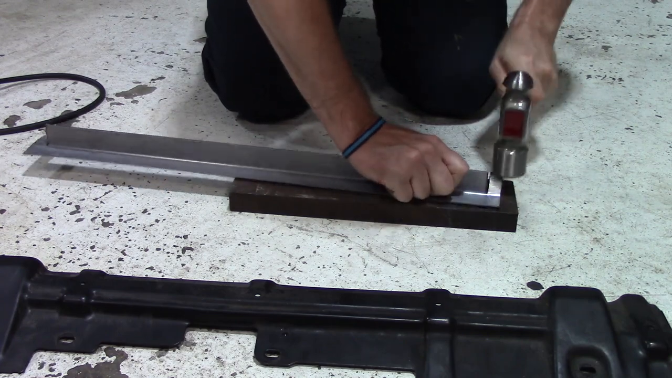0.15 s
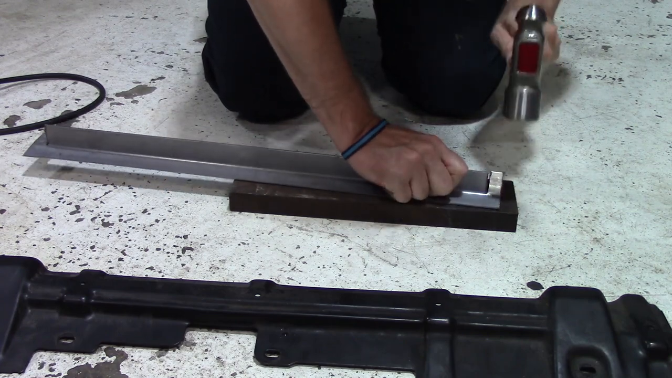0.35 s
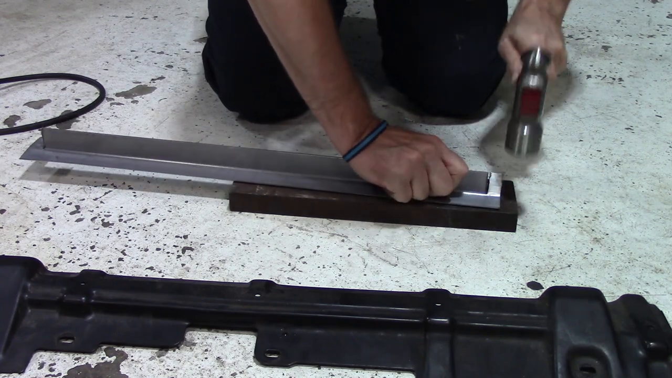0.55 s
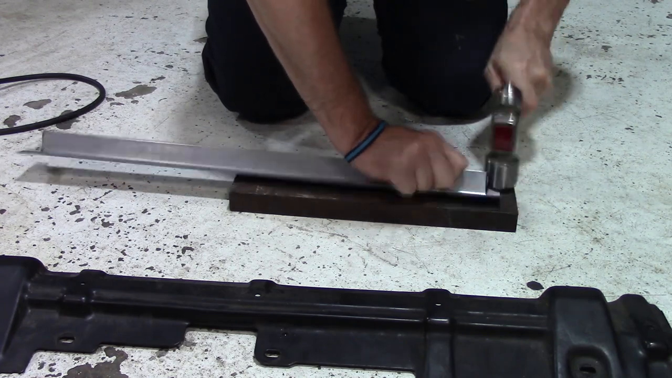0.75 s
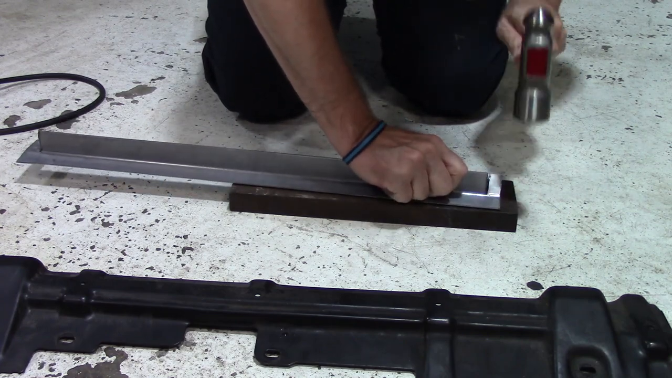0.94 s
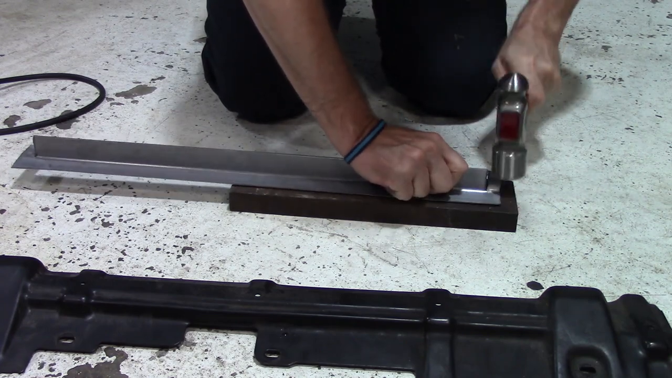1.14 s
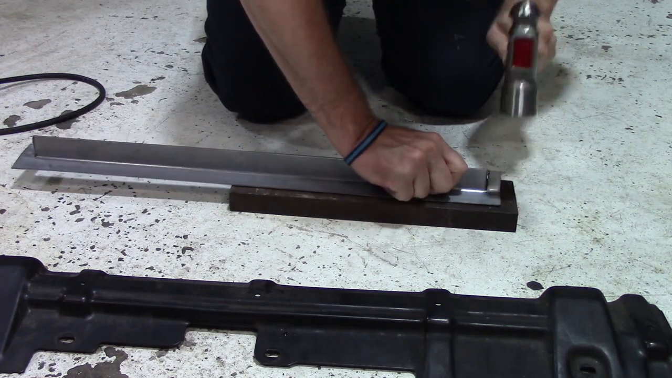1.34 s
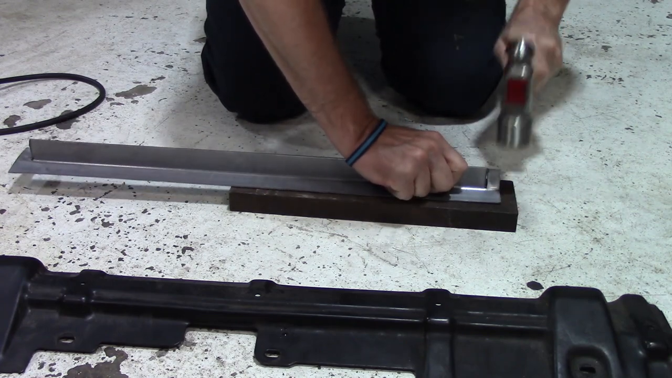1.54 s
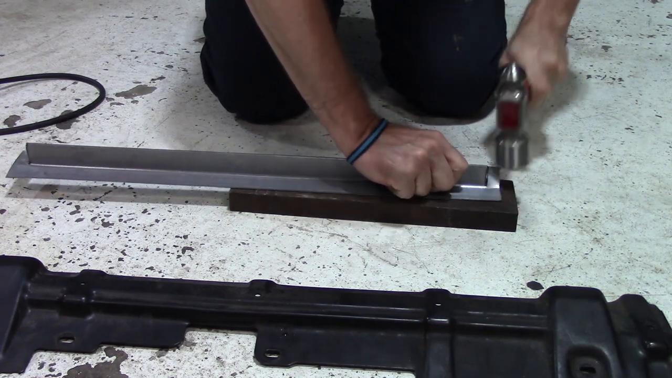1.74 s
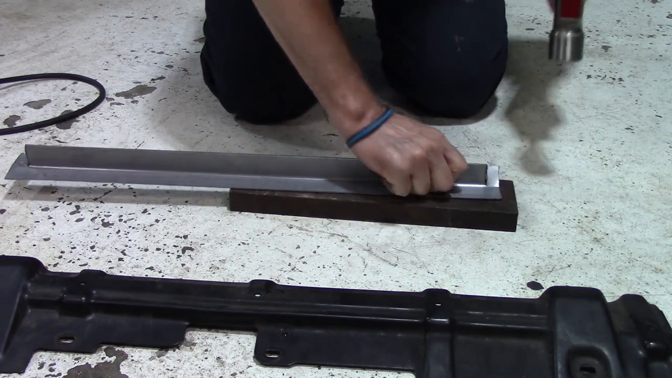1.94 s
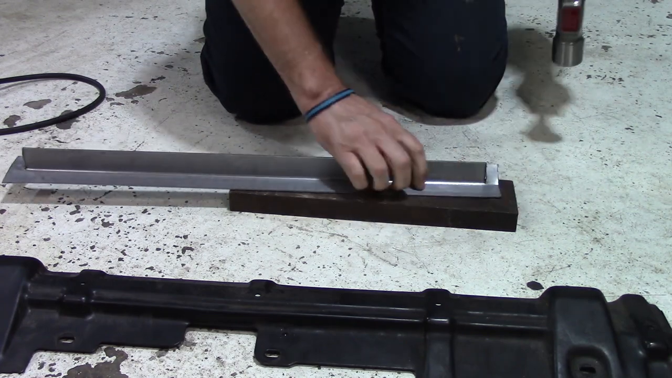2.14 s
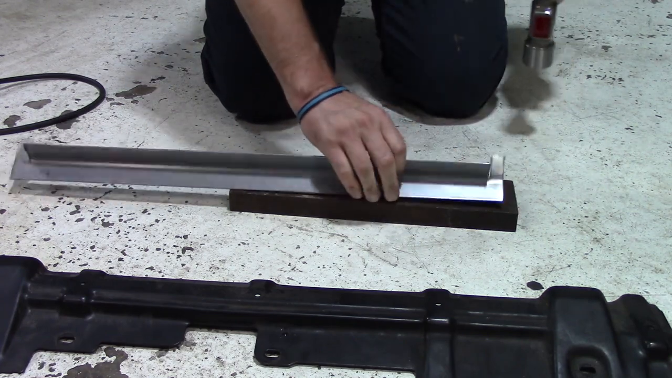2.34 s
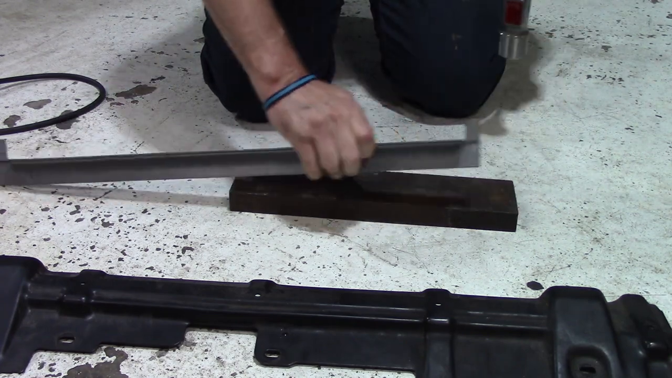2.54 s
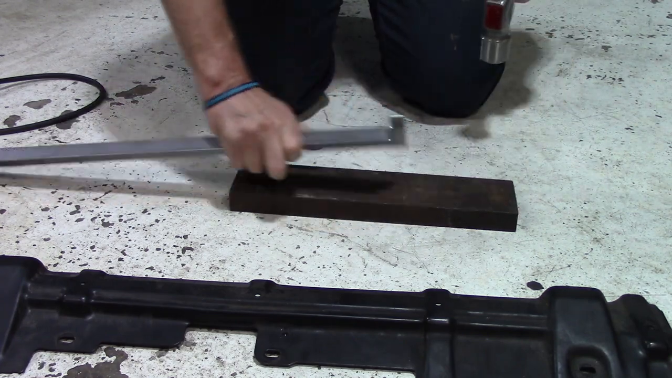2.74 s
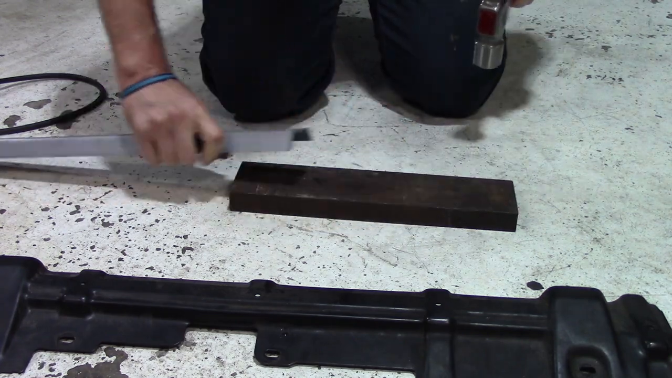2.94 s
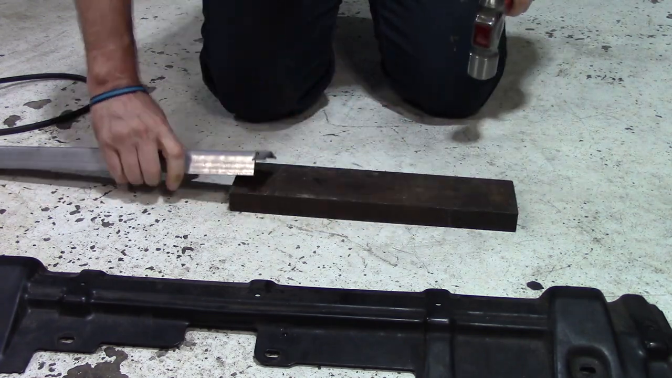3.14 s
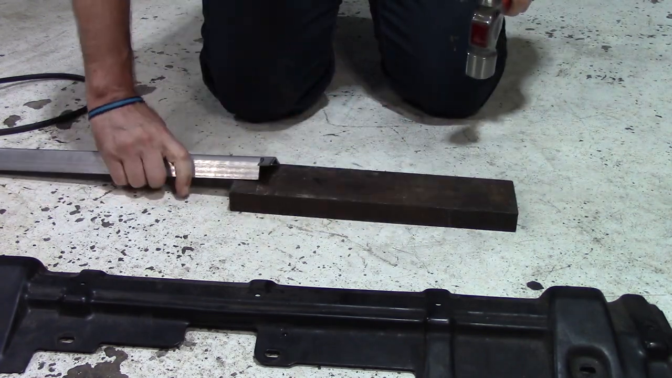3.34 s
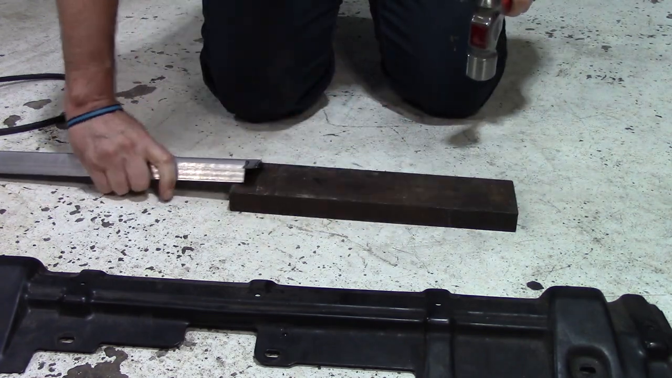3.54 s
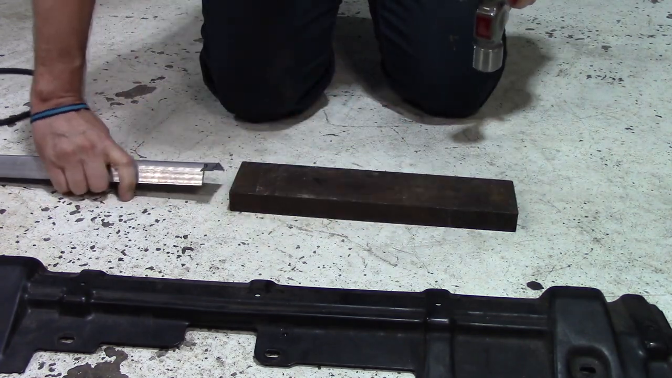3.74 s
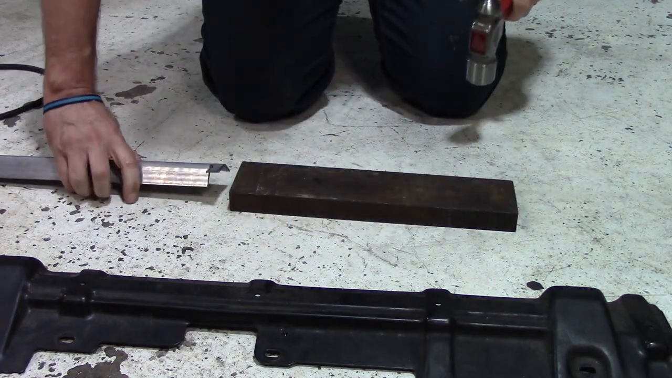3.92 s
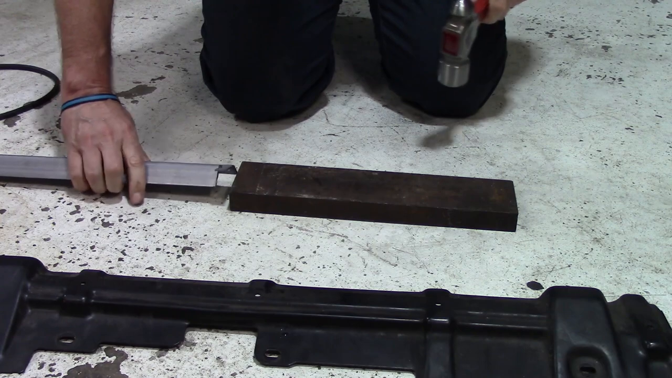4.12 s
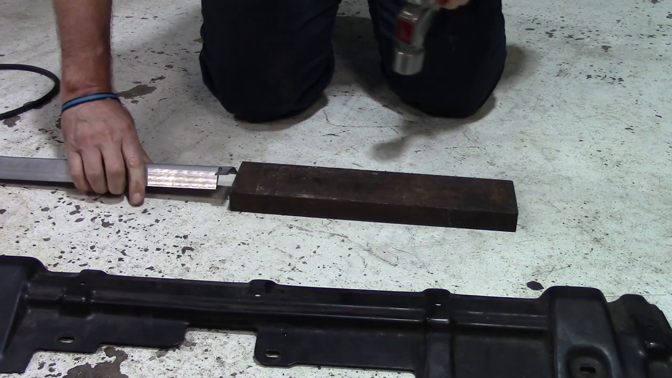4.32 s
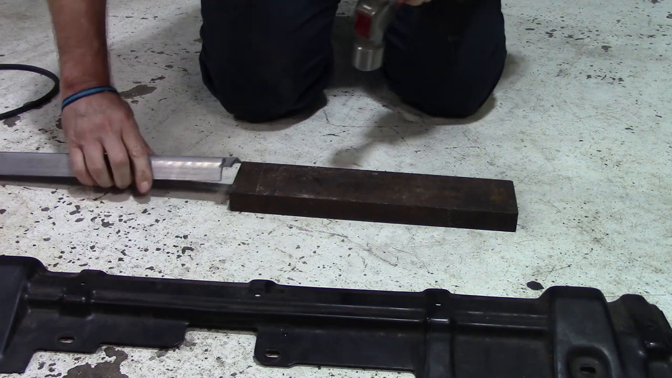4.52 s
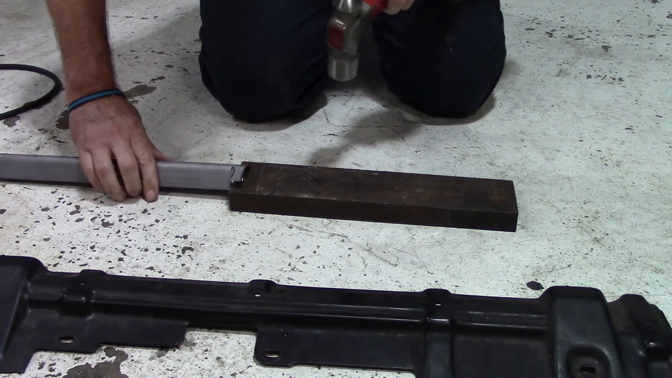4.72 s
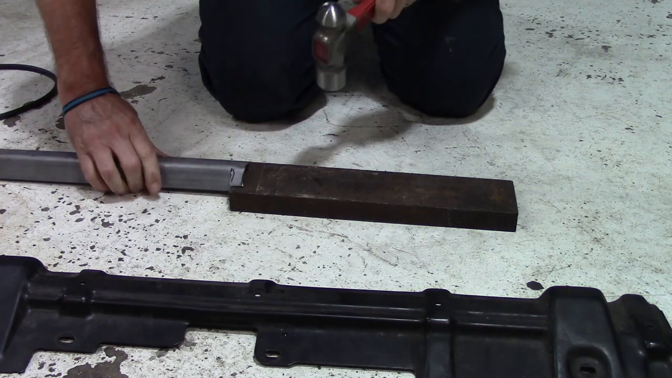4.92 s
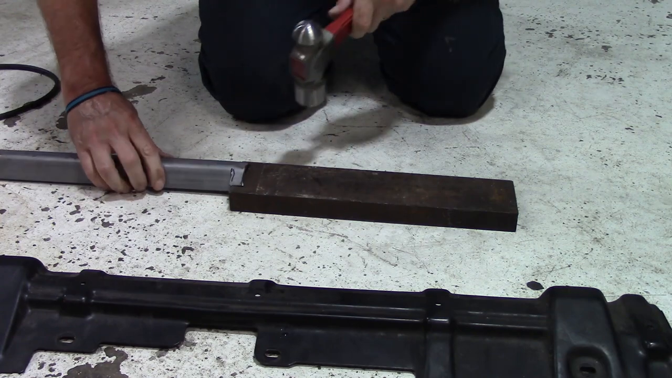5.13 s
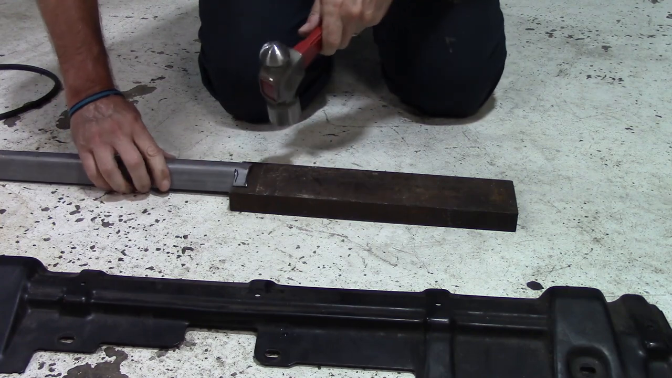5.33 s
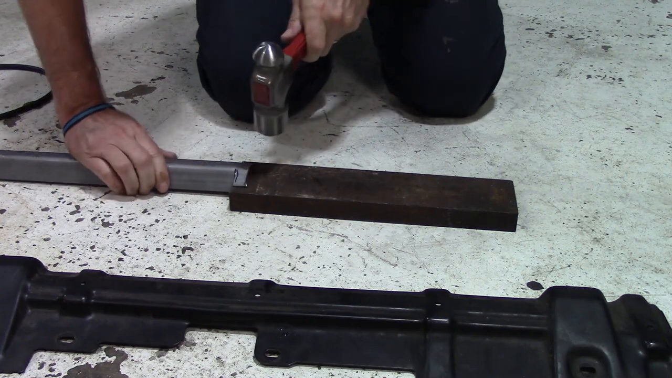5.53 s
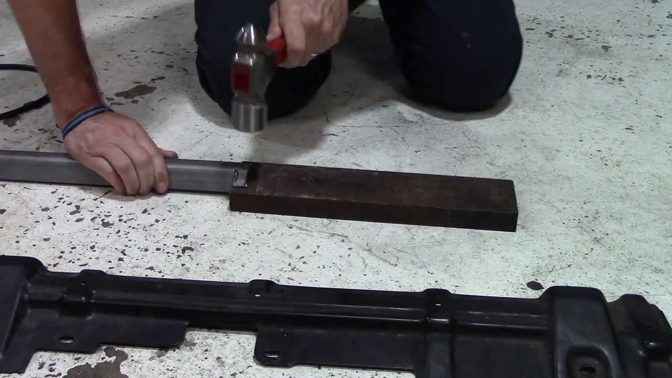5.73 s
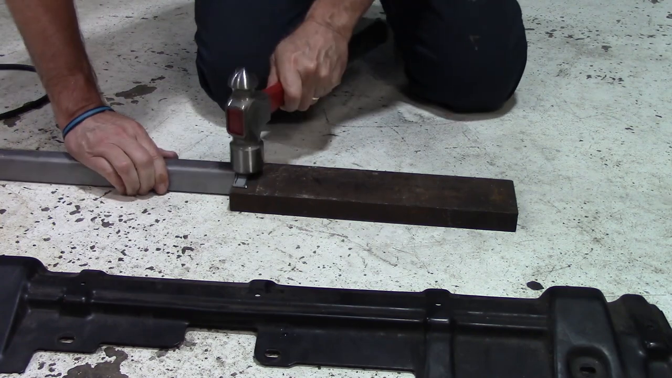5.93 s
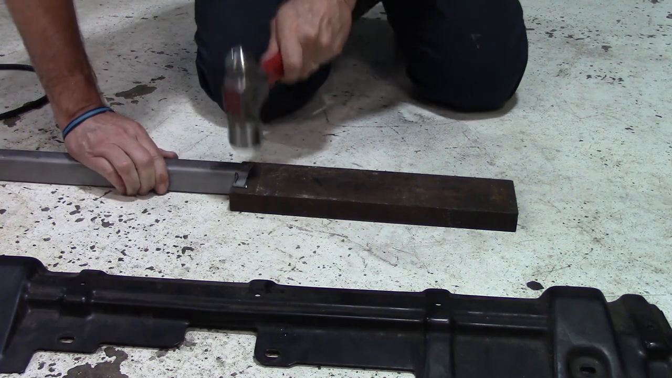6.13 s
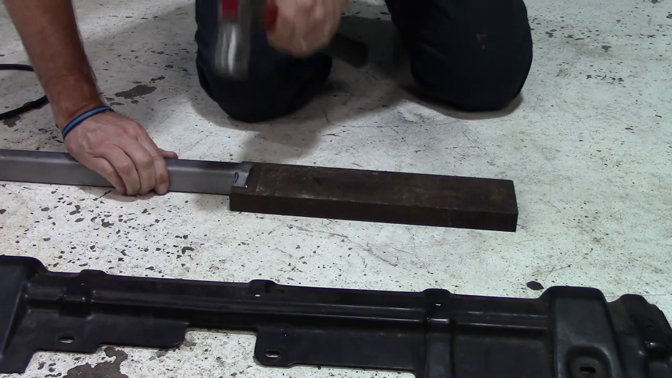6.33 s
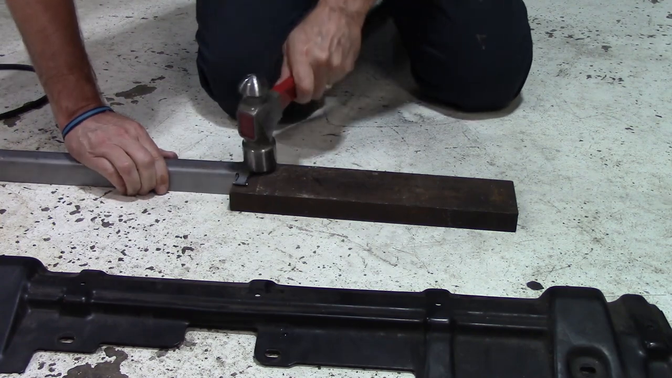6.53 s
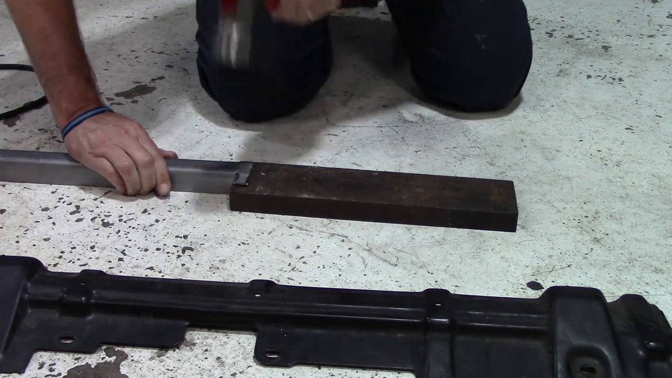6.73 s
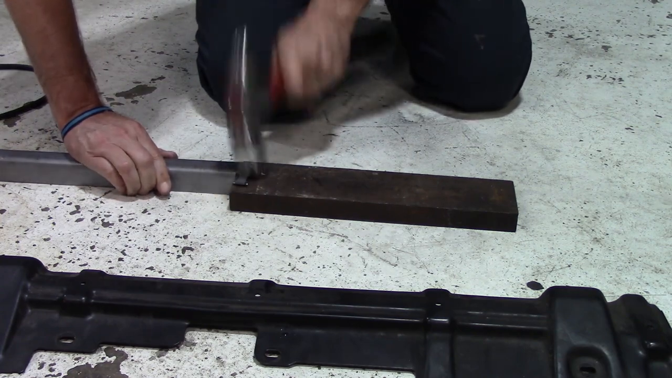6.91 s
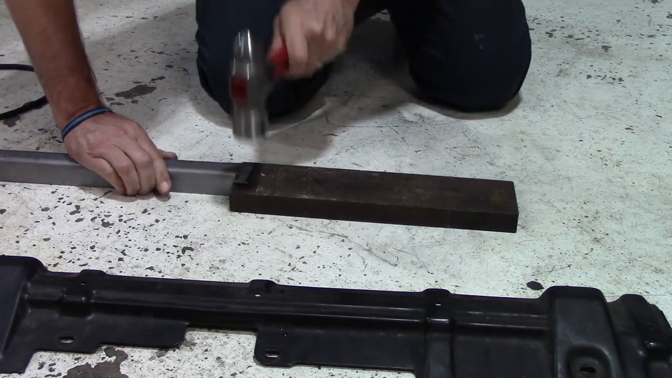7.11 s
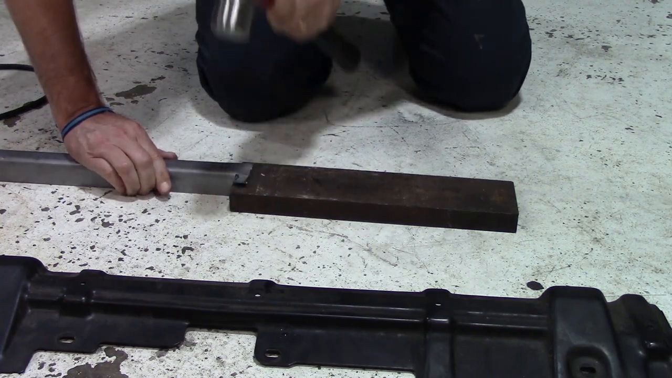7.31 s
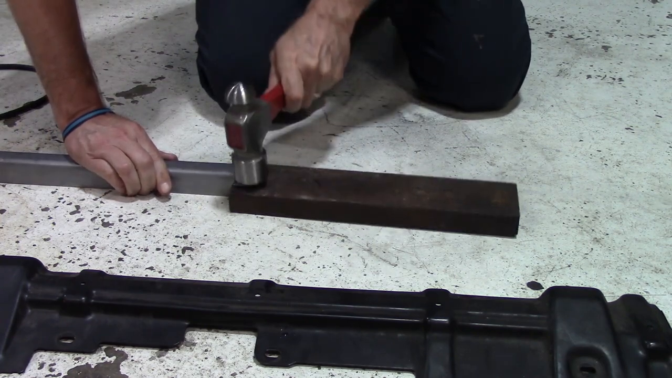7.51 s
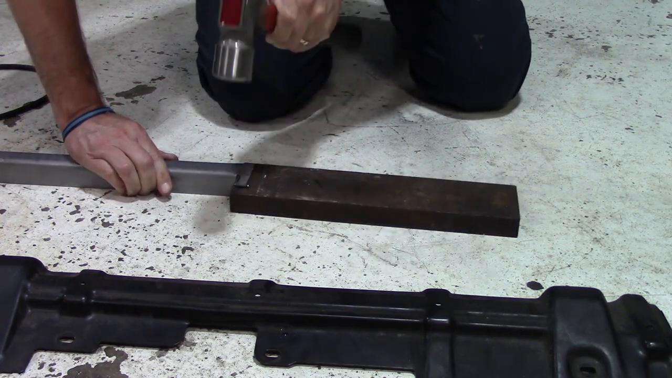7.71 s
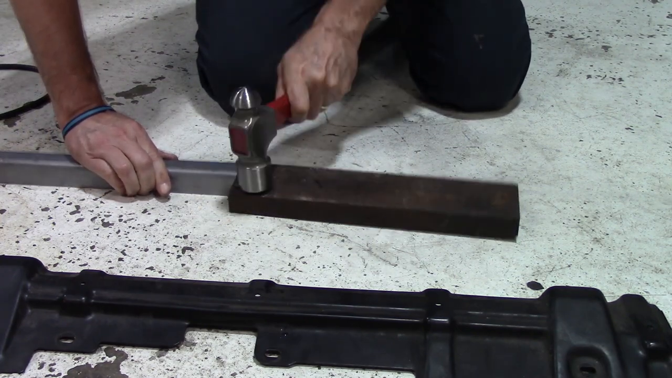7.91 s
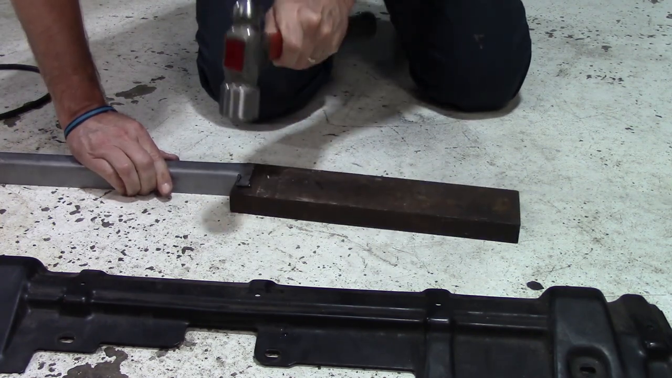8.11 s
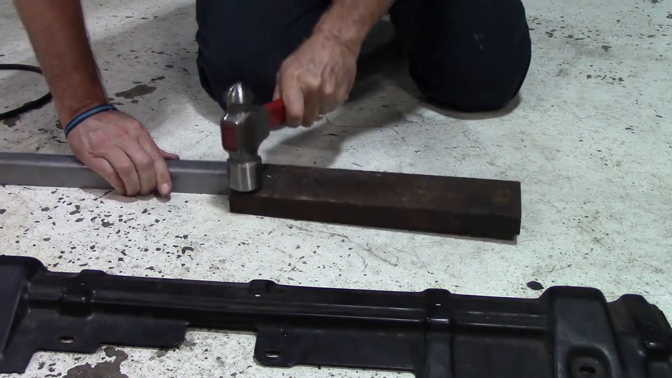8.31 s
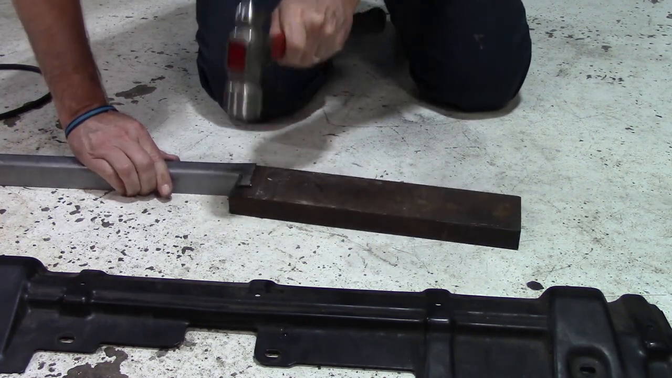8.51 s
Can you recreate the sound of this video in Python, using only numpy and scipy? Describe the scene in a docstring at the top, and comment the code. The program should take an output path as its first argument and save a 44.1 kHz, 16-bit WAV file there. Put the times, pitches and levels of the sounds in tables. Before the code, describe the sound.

Light hammer taps on thin metal, some knocking and scraping, then six loud clanging strikes in a garage.

```python
"""Hammering a sheet-metal rail

In a garage, a hammer bends the end of a rail over a steel block: six light blows, a pause in which
the rail is lifted, turned and seated again with knocks and scrapes, then six hard blows.
Each blow ticks, slams the rail into a clang and pings the bent tab; the squarer ones ring the block.
The room answers over a low murmur, and a quick limiter flattens the hard hits."""
import sys
import numpy as np
from scipy import signal
from scipy.io import wavfile
from scipy.ndimage import uniform_filter1d

SR = 44100
rng = np.random.default_rng(int(sys.argv[2]) if len(sys.argv) > 2 else 0)


def unload_wav(signal):
    """Save mono or channel-first audio to the path in sys.argv[1] as 16-bit WAV at rate SR, clipped to [-1, 1]."""
    wavfile.write(
        sys.argv[1],
        SR,
        np.round(np.clip(np.atleast_2d(signal).T, -1, 1) * 32767).astype(np.int16),
    )


N = 381906

# hammer blows: (time [s], tick [dB], slam delay [ms], slam [dB], extra bass [dB],
# brightness [dB/octave], ping [dB], block bend [dB], block twist [dB], spot along the block [0-1])
BLOWS = [(0.1782, -4.5, 0.085, -35.5, 5.5, -1, -15, -86, -80, 0.1),
         (0.4947, -7.5, 1.04, -26.5, 3.5, 4.5, -19, -86, -83, .3),
         (0.8166, -10.5, 1.05, -18, -1.5, -1.9, -24, -80, -78, .3),
         (1.1477, -5.5, 8.64, -24, 4, -1.3, -11, -80, -80, 0.2),
         (1.4788, -3.5, 11.06, -18, 0.5, -8, -13.5, -82, -80, .3),
         (1.7459, -5.5, 11.54, -14, -3.5, -3.5, -19, -15.5, -33, 0.09),
         (5.995, 14.5, 5.7, 1.5, -10, -1.4, -8.5, -80, -81, .3),
         (6.466, 1, 1.45, 10, -6.5, -0.36, 13.5, -14, -30, 0.14),
         (6.9923, -7, 0.939, 6.5, 3.5, 1.8, -22, 2.5, 4.5, 0.15),
         (7.468, -24, 0.27, -5, 2, 0.5, -32, -1, -8.5, 0.14),
         (7.918, -0.5, 0.34, -8, 2.5, -1.5, -15, -4.5, -13.5, 0.11),
         (8.3463, -25, 0.57, -10, -4.2, 0.5, -32, -13.5, -15.5, 0.07)]
# slam bands, from boom through thud, hollow, clang, ring, clack and sizzle to fizz: (low [Hz], high [Hz])
SLAM_BANDS = [(50, 230), (230, 600), (600, 1100), (1100, 1700), (1700, 2700), (2700, 5600), (5600, 9000),
              (9000, 15000)]
# tone of the slam, a row per band: (rail flat [dB], rail turned over the edge [dB])
SLAM_EQ = [(-10, -10), (4.5, -3), (-3, -9), (-8, -1), (2.5, 1), (4.5, -5), (0.5, 1), (-7, 2)]
# rail resonances: (pitch [Hz], base width [Hz], flat on the block [dB], lifted [dB], turned [dB])
RAIL_MODES = [(317, 32, -10, 10.5, -7), (449.3, 16, 7.5, 10, 0.5), (803, 150, -3, 12.5, 4.5),
              (1055, 6.7, -19, 8.5, -24), (1370, 17, -10.5, 12, -31), (1467, 79, 12.5, -13.5, -13),
              (1512, 45, 12.5, -7.5, -5), (1794, 8.1, 2, 14, 4.5), (1930, 13, -16.5, 6, -4.5),
              (2108, 142, -6.5, 2.5, 6), (2205, 11, -10.5, -10, 4), (2480, 17, -0.5, 6, -8.5),
              (2828, 160, 0.5, -13, -9), (3083, 310, 4, -5, -0.5), (3444, 140, -3.5, 7, 1.5),
              (3730, 76, 5.5, 3, 2.5), (4080, 55, -15, 1, 1.5), (4790, 27, -12.5, 9.5, 0),
              (5900, 80, -10.5, 4, -8), (6120, 63, -4, 10, 11.5), (7030, 47, -14, 5, 7.5),
              (7515, 140, 10.5, 6, -1), (8940, 120, -9.5, 7, 1.5), (11400, 180, -4, -26, -5)]
# steel block modes, each a close pair: (pitch [Hz], t60 [s], split [Hz])
BLOCK_MODES = [(1213, .3, 14), (2763, .36, 13), (3235, .22, 28), (5599, .33, 7), (6043, .5, 9),
               (8557, .16, 6), (9480, .3, 9), (11700, .3, 9)]
# strength of each block mode: (level [dB])
BLOCK_MODE_DB = [-8, 5.5, 7.5, 9.5, -7, 12, -16.5, -10.5]
# shape of each block mode; whole numbers twist, the others bend: (half waves along the block [count])
HALF_WAVES = np.array([1.5, 1, 2.5, 2, 3.5, 3, 4.5, 4])
# knocks as the loose rail is handled, the rail hitting block and floor, plus two low thumps near 5.7 s: (time
# [s], ring [dB], sharpness [dB], weight [dB], ring decay [ms])
KNOCKS = [(0.0194, -41, -2.5, -12, 2.4), (2.4144, -50.5, -1, -24, 7.3), (2.48, -49, 24, 10, 5.7),
          (2.4887, -33, 2.5, -14.5, 38), (2.6006, -39.5, 3.5, -8, 15), (2.79, -39.5, -11, -11, 16),
          (2.8268, -39.5, -13, -22, 26), (2.9642, -38, -6, -26, 9.4), (3.1236, -20.5, -16, -24, 3.5),
          (3.2939, -30.5, 0.5, -18, 28), (3.544, -48.5, 14, 12.5, 6.2), (3.666, -40, 7, -3, 4.8),
          (3.68, -20, -3, -30, 3.9), (3.701, -44, 16.5, -12, 12), (3.7267, -40, 21, -12, 3.6),
          (3.753, -23.5, 2.5, -10, 3.5), (3.8494, -42.5, 3.5, -33, 17), (3.998, -36, -15.5, -29.5, 8.7),
          (4.1609, -17, -9.5, -18, 9.4), (4.2238, -36.5, -12, -22, 24), (4.4782, -30.5, -4.5, -10.5, 7.2),
          (4.5018, -24.5, -8, -22, 8.8), (4.7072, -28, -5, -9.5, 13.6), (4.722, -21, -12, -14, 5.1),
          (5.016, -34.5, 3.5, -31, 8.4), (5.0735, -37.5, -10, -8, 12), (5.2954, -24.5, -15.5, -12, 9.4),
          (5.6735, -56, 14, 5, 14), (5.705, -57.5, 7, 23, 12.5), (7.5684, -15.5, 10, -3.5, 7.8),
          (7.6354, -13.5, -8, -21, 6.3), (8.0095, -14.5, 8.5, -10.5, 10.3), (8.448, -18.5, 2, -8, 16.6),
          (8.496, -15.5, -1.5, -13, 6.8)]
# the rail drags over block and concrete: (start [s], length [s], rub [dB], hiss [dB])
SCRAPES = [(2.254, 0.2, -71.5, -67.5), (2.666, 0.17, -53.5, -65), (2.815, 0.34, -50.5, -60),
           (3.488, 0.21, -45.5, -53), (3.637, 0.12, -55, -47), (3.692, 0.15, -43, -71),
           (4.364, 0.36, -52, -63.5), (5.219, 0.11, -52.5, -60), (5.595, .27, -65.5, -57)]
# garage reverb time: (frequency [Hz], t60 [s])
GARAGE_T60 = [(100, 0.3), (300, 0.67), (800, 0.63), (2000, 0.57), (5000, 0.6), (9000, 0.45), (14000, 0.33)]
# early reflections off the floor and near walls: (delay [ms], level [dB])
ECHOES = [(9, -15.5), (15, -15.5), (21, -26.5), (27, -16)]
# colour of the room tone: (frequency [Hz], relative level [dB])
ROOM_TONE_EQ = [(25, -30.5), (60, 4), (120, -3), (350, 0), (800, -8), (1400, -6.5), (2200, -16),
                (4000, -17), (8000, -23), (12000, -31), (15500, -43)]
# fader ride of the room tone, swelling in the pause: (time [s], level [dB])
ROOM_TONE_RIDE = [(0, -55.5), (.15, -65), (1.099, -62), (2.3, -64), (3.299, -58), (4.1, -58), (5.2, -53),
                  (5.6, -49.5), (5.95, -53), (6.1, -49), (8.66, -65)]

LIFTED_S, TURNED_S = 2.25, 3.25  # the rail changes pose
RATTLE_FLAT_MS, RATTLE_TURNED_MS, RATTLE_PER_DELAY = 4.65, 8.83, 0.35  # a later slam rattles longer
PING_FLAT_HZ, PING_TURNED_HZ = 1520, 780
PING_BASE_MS, PING_PER_DELAY = 6, 1.75  # a later slam lets the ping swell longer


def hammer_blows():
    """A bright tick of the hammer face jolts the pinned rail, which slams and clangs as its tab pings."""
    times, tick_db, delay_ms, slam_db, bass_db, bright_db, ping_db, *_ = np.transpose(BLOWS)
    turned = times > TURNED_S
    slam_times = times + delay_ms / 1000
    rattle_ms = np.where(turned, RATTLE_TURNED_MS, RATTLE_FLAT_MS) + RATTLE_PER_DELAY * delay_ms
    noise = rng.standard_normal((len(SLAM_BANDS) + 1, N))
    face = bursts(times, tick_db, decay_ms=np.full(len(times), 2.8), rise_ms=.15) * noise[-1]
    body, edge, top = (band(face, *hz) for hz in ((2500, 6500), (6500, 10500), (10500, 15500)))
    tick = gain_of(-10) * body + gain_of(-1.5) * edge + gain_of(-5.5) * top
    shake = gain_of(-12.5) * band(face, 1000, 3000) + gain_of(-20.5) * band(face, 240, 700)
    for (flat_db, turned_db), rattle, (lo_hz, hi_hz) in zip(SLAM_EQ, noise, SLAM_BANDS):
        stretch = min(lo_hz / 1100, 1)  # the bass is one short push, the upper bands rattle on
        colour_db = bass_db if stretch < 1 else bright_db * np.log2(lo_hz / 1700)
        band_db = slam_db + np.where(turned, turned_db, flat_db) + colour_db
        envelope = bursts(slam_times, band_db, stretch * rattle_ms, rise_ms=0.84 * stretch)
        shake += band(envelope * rattle, lo_hz, hi_hz) / np.sqrt(stretch)
    pings = np.zeros(N)
    ping_hz = np.where(turned, PING_TURNED_HZ, PING_FLAT_HZ)
    for start, late_ms, db, hz in zip(slam_times, delay_ms, ping_db, ping_hz):
        tone = tab_ping(hz, PING_BASE_MS + PING_PER_DELAY * late_ms)
        at = round(start * SR)
        pings[at:at + len(tone)] += gain_of(db) * tone
    return tick + pings + rail_clang(shake, damping=(1.3, 1.1, 2.4))


def rail_clang(shake, damping):
    """Shaking passes dry and through the rail's modes, widened by damping: (flat, lifted, turned)."""
    out, t = gain_of(-3.5) * shake, np.arange(SR // 3) / SR
    hz, width, *pose_db = np.transpose(RAIL_MODES)[:, :, None]
    pose = np.digitize(np.arange(N) / SR, [LIFTED_S, TURNED_S])
    for k, (db, widening) in enumerate(zip(pose_db, damping)):
        decay = np.pi * width * widening  # per second
        strength = gain_of(db) / np.sqrt(widening) * 2 * decay / SR
        modes = strength * np.exp(-decay * t) * np.cos(2 * np.pi * hz * t)
        out += signal.fftconvolve(shake * (pose == k), modes.sum(0))[:N]
    return out


def tab_ping(hz, length_ms):
    """The bent tab sings one clean tone that swells slowly and is stopped quickly."""
    t = np.arange(int(length_ms * SR / 1000)) / SR
    swell = np.sin(np.pi * (1000 * t / length_ms) ** 2.6)
    return swell * np.sin(2 * np.pi * hz * t)


def block_ring():
    """The steel block rings in beating pairs of tones that flutter as it rocks on the concrete."""
    out, t = np.zeros(N + SR), np.arange(SR) / SR
    bends = HALF_WAVES % 1 > 0
    rocking = rng.standard_normal((len(BLOWS), len(BLOCK_MODES), 2, 45))
    for (start, _, delay_ms, *_, bend_db, twist_db, spot), wobbles in zip(BLOWS, rocking):
        if max(bend_db, twist_db) < -60:  # a glancing blow leaves the block silent
            continue
        at = round((start + delay_ms / 1000) * SR)
        along = np.pi * HALF_WAVES * spot
        bending = np.cos(along + np.pi / 4) + np.exp(-along) / np.sqrt(2)  # a bar with free ends
        coupling = abs(np.where(bends, bending, np.cos(along))) + 0.23  # weak when struck near a node
        strengths = coupling * gain_of(np.where(bends, bend_db, twist_db) + BLOCK_MODE_DB)
        for (hz, t60, split_hz), strength, wobble in zip(BLOCK_MODES, strengths, wobbles):
            sway, slip = (np.interp(t, np.linspace(0, 1, len(w)), w) for w in wobble)
            phase = 2 * np.pi * hz * t + 0.7 * slip
            pair = np.sin(phase) + 0.21 * np.sin(phase + 2 * np.pi * split_hz * t)
            out[at:at + SR] += strength * gain_of(1.3 * sway - 60 * t / t60) * pair
    return out[:N]


def rail_handling():
    """Knocks and scrapes shake the loose rail, which rings longer than when it is pinned."""
    times, ring_db, sharp_db, weight_db, decay_ms = np.transpose(KNOCKS)
    clack_db = ring_db + sharp_db
    noise = rng.standard_normal((4, N))
    rub, hiss = scrapes()
    thud = bursts(times, ring_db + weight_db, 1.17 * decay_ms, rise_ms=4) + gain_of(-15) * rub
    ring = bursts(times, ring_db, decay_ms, rise_ms=5.3) + rub
    clack = bursts(times, clack_db, 0.25 * decay_ms, rise_ms=0.33) + gain_of(-8) * rub
    top = bursts(times, clack_db - 5.5, 0.76 * decay_ms, rise_ms=0.26) + hiss
    shake = (band(thud * noise[0], 208, 730) + band(ring * noise[1], 1160, 2650)
             + band(clack * noise[2], 1550, 5760) + band(top * noise[3], 6900, 12800))
    return rail_clang(shake, damping=(.9, .25, .45))


def scrapes(grains_per_s=3000):
    """Rub and hiss envelopes of the rail dragging over grit, each stroke swelling and fading."""
    t = np.arange(N) / SR
    grain_db = 1.35 * np.minimum(rng.exponential(1, N), 5)
    grains = gain_of(grain_db) * (rng.random(N) < grains_per_s / SR)
    grit = uniform_filter1d(grains, 30)
    grit /= np.sqrt(np.mean(grit ** 2))
    rub, hiss = np.zeros((2, N))
    for start, length, rub_db, hiss_db in SCRAPES:
        stroke = np.sin(np.pi * np.clip((t - start) / length, 0, 1)) ** 1.2 * grit
        rub += gain_of(rub_db) * stroke
        hiss += gain_of(hiss_db) * stroke
    return rub, hiss


def garage_reverb(x, tail_db):
    """Early reflections, then two unlike tails of sparse echoes whose bands die at their own speed."""
    taps = np.zeros((2, SR))
    at = np.arange(200, SR - 20, 20) + rng.integers(0, 20, (2, (SR - 201) // 20))
    np.put_along_axis(taps, at, rng.choice([-1., 1.], at.shape), 1)
    hz, t, spectrum = signal.stft(taps, SR, nperseg=256)
    fade = gain_of(-60 * t / curve_at(GARAGE_T60, hz)[:, None])
    tail = signal.istft(spectrum * fade, SR, nperseg=256)[1][:, :SR]
    tail *= 1 - np.exp(-np.arange(SR) / SR / 0.0028)  # soft onset
    tail *= gain_of(tail_db) / np.linalg.norm(tail[0])
    for ms, db in ECHOES:
        tail[:, round(ms * SR / 1000)] += gain_of(db)
    return signal.fftconvolve(x[None], tail, axes=1)[:, :N]


def room_tone(drift_db=1.5):
    """Low murmur of the garage: two noise streams that share a gently drifting colour."""
    frames, hz = N // 256 + 5, np.fft.rfftfreq(1024, 1 / SR)
    draws = rng.standard_normal((frames, 513, 5)).T
    white = draws[0:4:2] + 1j * draws[1:4:2]
    drift = uniform_filter1d(uniform_filter1d(draws[4], 10, 0), 14, 1)  # smooth in frequency and time
    colour = gain_of(curve_at(ROOM_TONE_EQ, hz)[:, None] + drift_db * drift / drift.std())
    murmur = signal.istft(white * colour, nperseg=1024, noverlap=768)[1][:, :N]
    ride_db = np.interp(np.arange(N) / SR, *np.transpose(ROOM_TONE_RIDE))
    return murmur / murmur.std() * gain_of(ride_db)


def bursts(times, levels_db, decay_ms, rise_ms):
    """Envelope of contacts: a quick attack, then an exponential decay."""
    out, t_ms = np.zeros(N + SR), 1000 * np.arange(SR // 8) / SR
    attack = 1 - np.exp(-t_ms / rise_ms)
    for start, db, fall_ms in zip(times, levels_db, decay_ms):
        at = round(start * SR)
        out[at:at + len(t_ms)] += gain_of(db) * attack * np.exp(-t_ms / max(fall_ms, .3))
    return out[:N]


def band(x, lo_hz, hi_hz):
    """Band-pass that keeps the rms of white noise."""
    sos = signal.butter(3, [lo_hz, hi_hz], "bandpass", fs=SR, output="sos")
    return signal.sosfilt(sos, x) / np.sqrt(2 * (hi_hz - lo_hz) / SR)


def curve_at(points, hz):
    """Read (frequency [Hz], value) points on a logarithmic frequency axis."""
    freqs, values = np.transpose(points)
    return np.interp(np.log(hz + 1), np.log(freqs + 1), values)


def gain_of(db):
    """Decibels to amplitude."""
    return 10 ** (np.asarray(db) / 20)


def scene():
    """Near-mono mix: the metal sits in the centre, the room adds a little width, mostly in the treble."""
    metal = hammer_blows() + block_ring() + rail_handling()
    room_mid, room_side = garage_reverb(metal, tail_db=-6.5) + room_tone()
    side_treble = signal.lfilter(*signal.butter(2, 1800, "highpass", fs=SR), room_side)
    side = gain_of(-19) * side_treble + gain_of(-29) * room_side
    return metal + room_mid + side * np.array([[1], [-1]])


def record(dry, threshold_db=-11, detector_s=0.0058, release_db_per_s=1400, top_hz=16000):
    """Bass cut, a quick limiter whose first peaks slip past and clip, then a steep high cut."""
    thin = signal.sosfilt(signal.butter(2, 90, "highpass", fs=SR, output="sos"), dry)
    dulled = signal.lfilter(*signal.butter(1, 13000, fs=SR), thin)  # the capsule softens the top
    pole = np.exp(-1 / (detector_s * SR))
    power_db = 10 * np.log10(signal.lfilter([1 - pole], [1, -pole], (dulled ** 2).mean(0)) + 1e-12)
    release_db = np.arange(N) * release_db_per_s / SR
    held_db = np.maximum.accumulate(power_db + release_db) - release_db
    reduction_db = np.maximum(held_db - threshold_db, 0)
    limited = np.clip(dulled / gain_of(reduction_db), -.97, .97)
    high_cut = signal.firwin(511, top_hz, window=("kaiser", 9), fs=SR)
    return np.clip(signal.oaconvolve(limited, high_cut[None], "same"), -1, 1)


dry = scene()
out = record(dry)
unload_wav(out)
```